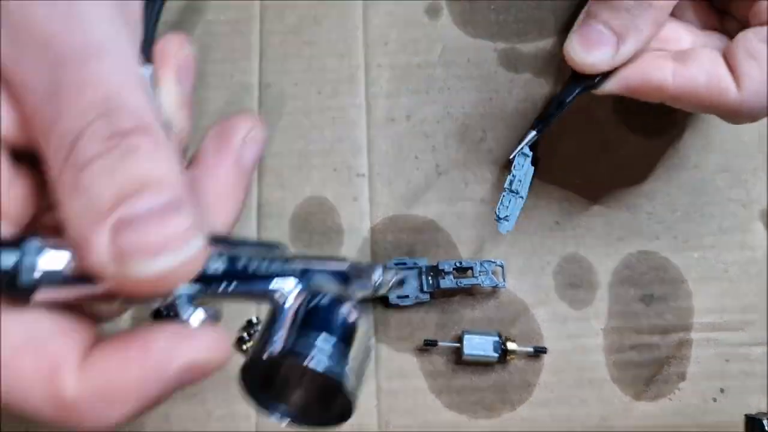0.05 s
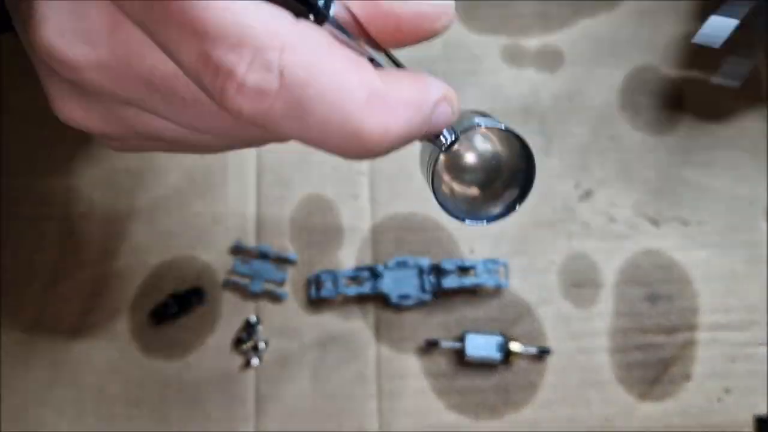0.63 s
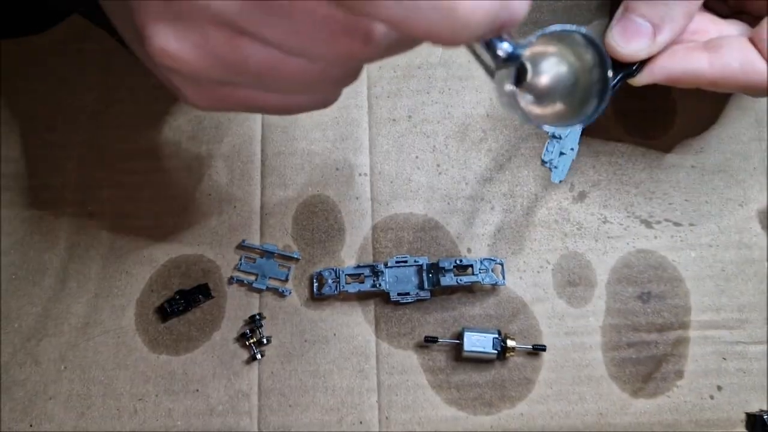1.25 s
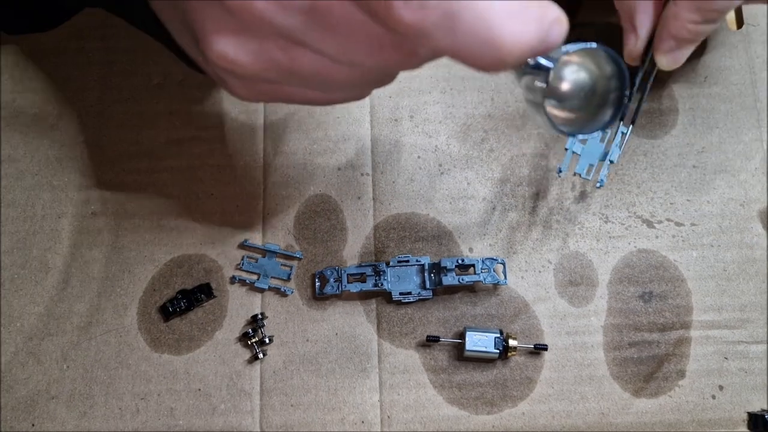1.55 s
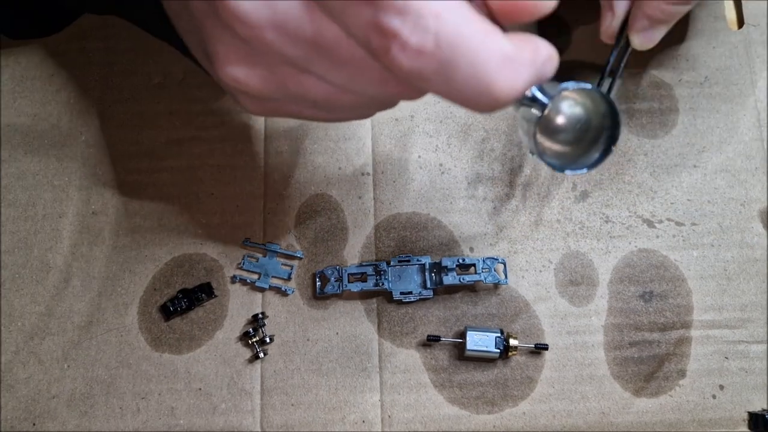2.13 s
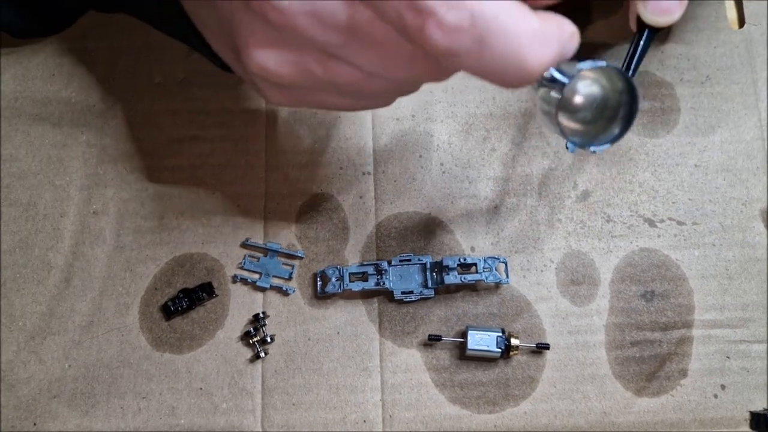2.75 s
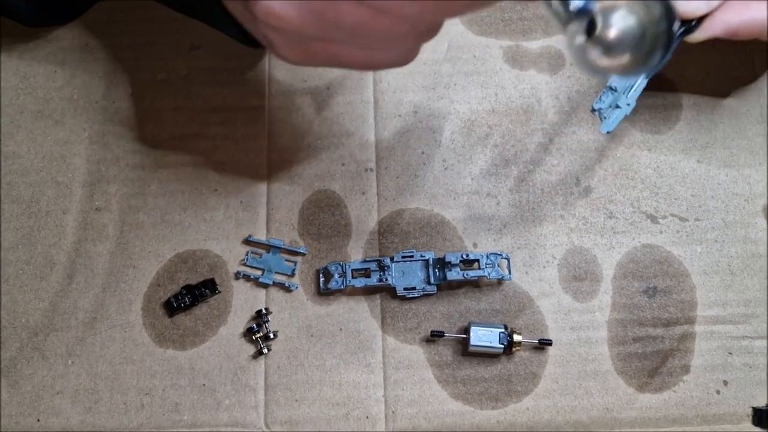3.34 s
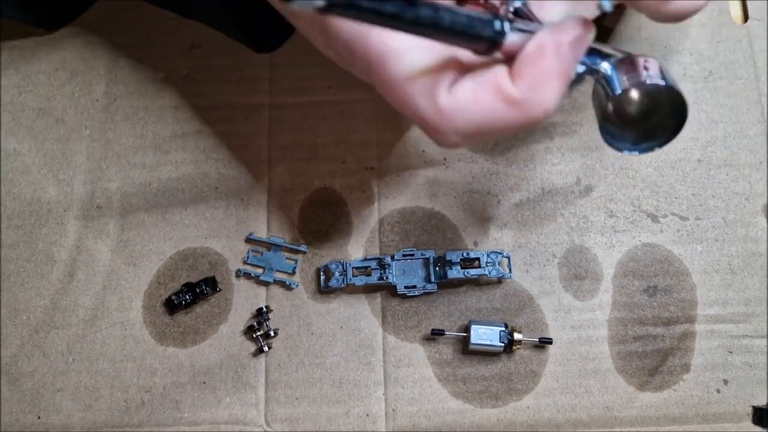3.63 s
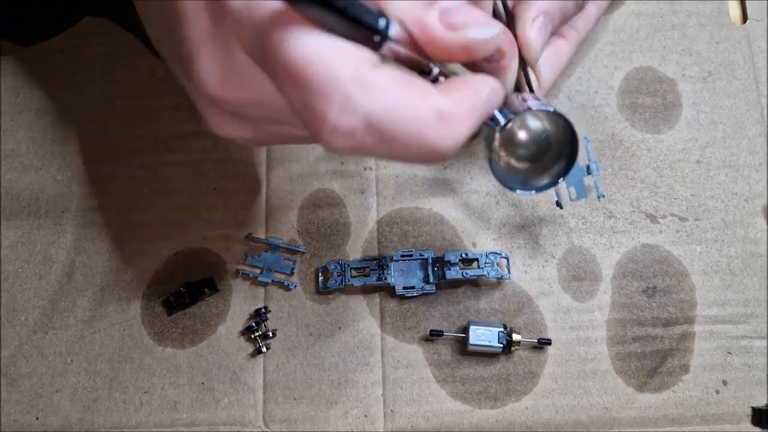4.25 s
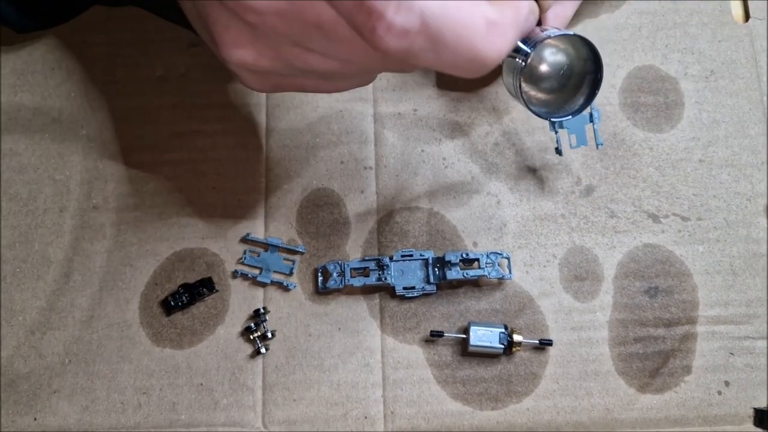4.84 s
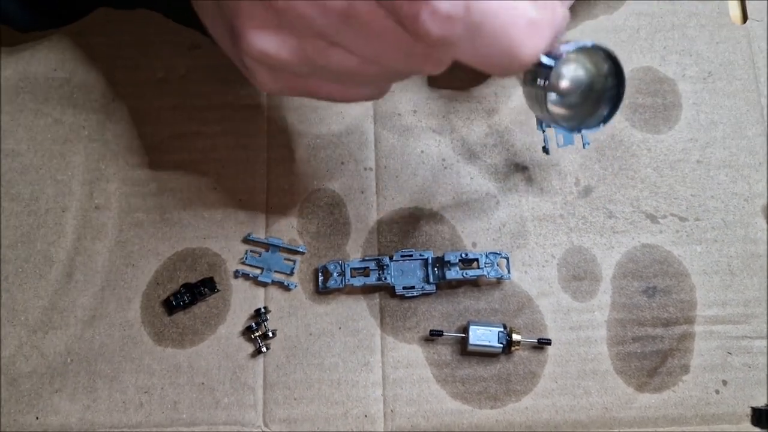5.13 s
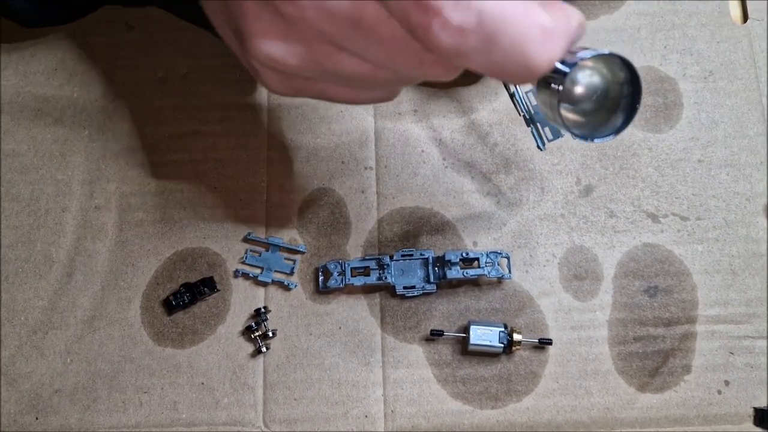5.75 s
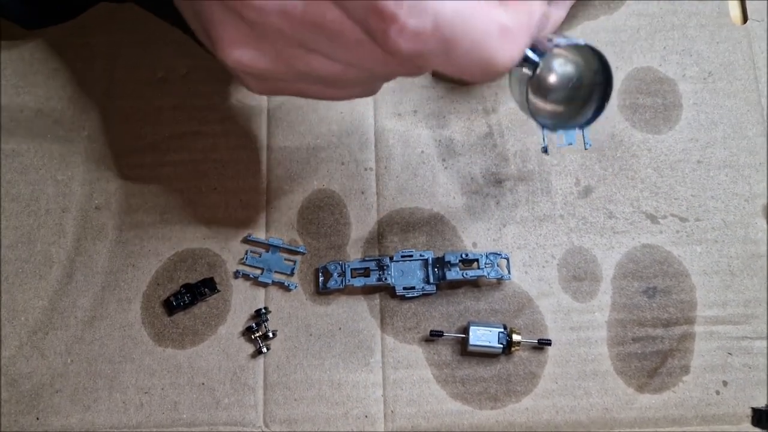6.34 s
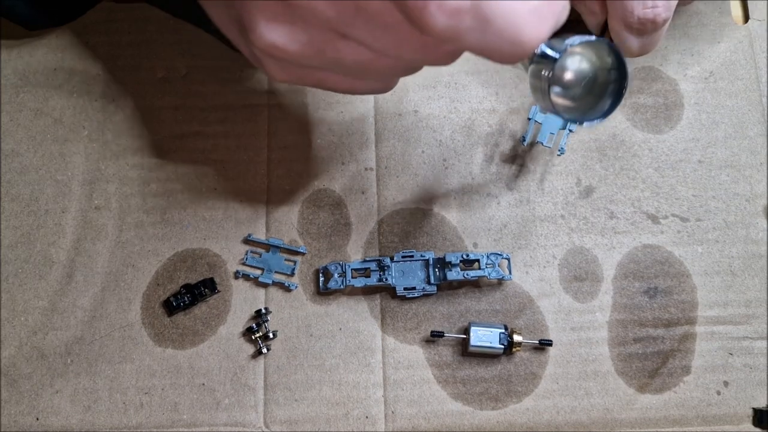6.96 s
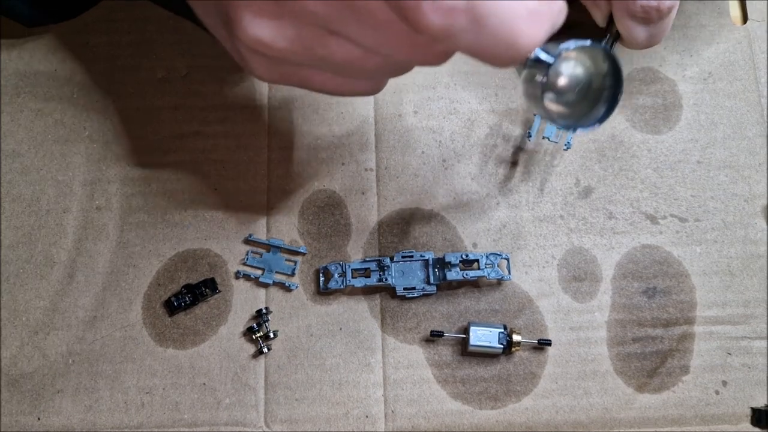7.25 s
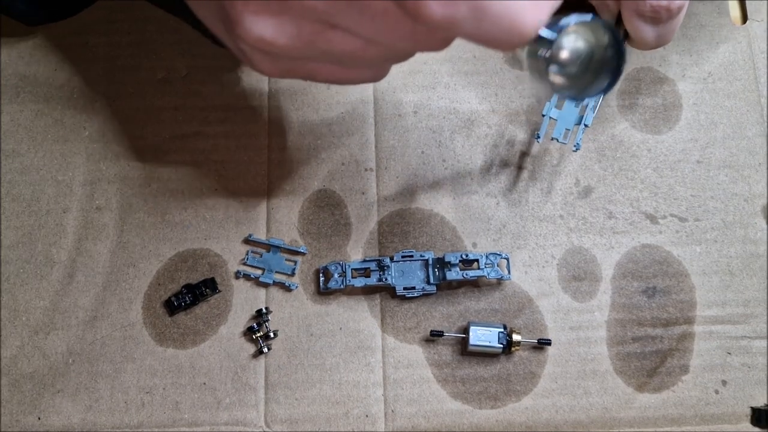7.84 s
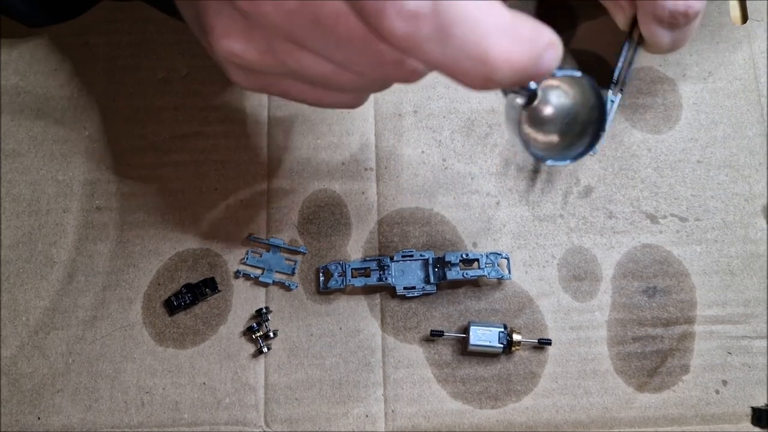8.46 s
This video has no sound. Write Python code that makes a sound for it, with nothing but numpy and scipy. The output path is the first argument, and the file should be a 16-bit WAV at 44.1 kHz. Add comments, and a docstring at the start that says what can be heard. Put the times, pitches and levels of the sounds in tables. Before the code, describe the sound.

A small compressor hums while an airbrush blows hissing bursts over small parts, with light tool clicks and a loud final jet of air.

```python
"""A small compressor hums at about 96 piston strokes a second, ducking at each puff of air and swelling in
long pauses. An airbrush blows dry air over small parts held in tweezers above cardboard: short taps of
the trigger, then longer blows. The tools click, and squeak once. Last comes a loud, ringing blast where
the jet strikes an edge of the part. Close, mono."""
import sys
import numpy as np
from scipy import signal
from scipy.fft import rfft, irfft, next_fast_len
from scipy.io import wavfile
from scipy.ndimage import uniform_filter1d, map_coordinates

SR = 44100
rng = np.random.default_rng(int(sys.argv[2]) if len(sys.argv) > 2 else 0)


def generate_wav(signal):
    """Clip the signal to [-1, 1] and save it as 16-bit WAV at the path in sys.argv[1]."""
    frames = np.transpose(np.atleast_2d(signal))
    scaled = np.clip(frames, -1, 1) * 32767
    pcm = np.round(scaled).astype(np.int16)
    wavfile.write(sys.argv[1], SR, pcm)


N = 374830
TOP_HZ = 15820


def amp(db):
    """Decibels to gain."""
    return 10 ** (np.asarray(db) / 20)


def unit(x):
    """Scale to rms 1."""
    return x / np.sqrt(np.mean(x ** 2) + 1e-20)


def clock():
    """Sample times in s."""
    return np.arange(N) / SR


def curves(rows):
    """One value per sample for each column after the time."""
    times_s, *columns = np.transpose(rows)
    return [np.interp(clock(), times_s, column) for column in columns]


def colour(points):
    """Gain against log frequency through (f/Hz, level/dB) points."""
    points_hz, db = np.transpose(points)
    return lambda hz: amp(np.interp(np.log(hz + 1), np.log(points_hz), db))


def resonances(modes):
    """Causal response of (f/Hz, width/Hz, level/dB) modes, alternating in sign."""
    return lambda hz: sum((-1) ** k * amp(db) * 1j * hz * width / (centre ** 2 - hz ** 2 + 1j * hz * width)
                          for k, (centre, width, db) in enumerate(modes))


def filtered(x, response):
    """Apply a frequency response."""
    size = next_fast_len(N + SR // 2)
    return irfft(rfft(x, size) * response(np.fft.rfftfreq(size, 1 / SR)), size)[:N]


def hiss(spectrum):
    """Coloured noise, rms 1, rolled off below its first point."""
    skirt = lambda hz: np.minimum(hz / spectrum[0][0], 1) ** 2
    return unit(filtered(rng.standard_normal(N), lambda hz: colour(spectrum)(hz) * skirt(hz)))


def wobble(rate_hz):
    """Smooth random curve with knots at rate_hz."""
    return map_coordinates(rng.standard_normal(int(N * rate_hz / SR) + 4), [clock() * rate_hz])


def gate(on_s, off_s, rise_s, fall_s):
    """1 between two times, with linear ramps."""
    t = clock()
    return np.clip((t - on_s) / rise_s + .5, 0, 1) * np.clip((off_s - t) / fall_s + .5, 0, 1)


def lagged(x, lag_s):
    """First-order lag."""
    step = 1 / (lag_s * SR)
    return signal.lfilter([step], [1, step - 1], x)


def stroke_rate_hz(valve, rest_hz=97.09, sag_hz=1.2, jolt_hz=.83, full_load=.67):
    """The motor sags while air is drawn and is jolted as the valve opens or shuts."""
    load = np.minimum(lagged(valve, lag_s=.09) / full_load, 1)
    return rest_hz - sag_hz * load + jolt_hz * (valve - lagged(valve, lag_s=.07))


# hum swells: start t/s, gain/dB
HUM_SWELLS = [(-.04, 10), (.72, 12), (3.68, 16), (6.66, 4)]


def swell_db(valve_threshold_db, rise_s=.31, drop_s=.0068, linger_s=.26, linger_share=.41):
    """The hum grows in a long pause and drops at the next full press; a share lingers."""
    t, total_db = clock(), np.zeros(N)
    for start_s, gain_db in HUM_SWELLS:
        press_s = min(on_s for on_s, _, db in TRIGGER_PRESSES if on_s > start_s and db > valve_threshold_db)
        grown = np.clip((np.minimum(t, press_s) - start_s) / rise_s, 0, 1)
        since_s = np.maximum(t - press_s, 0)
        lingering = linger_share * np.exp(-since_s / linger_s)
        dropping = (1 - linger_share) * np.exp(-(since_s / drop_s) ** 2)
        total_db += gain_db * grown * (lingering + dropping)
    return total_db


# piston tone: multiple of stroke rate, relative level/dB
STROKE_PARTIALS = [(1, -35), (2, -7), (3, -13), (4, -2), (5, -3), (6, 0), (7, -3), (8, -2.5), (9, -13),
                   (10, -1), (11, -0.5), (12, -7), (13, -15.5), (14, -19), (15, -3.5), (16, -68), (17, 0),
                   (18, -8.5), (19, 1), (20, -5), (21, -0.5), (22, -3), (23, -7), (24, -25), (25, -4.5),
                   (26, -2), (27, -5), (28, -18), (29, -3), (30, -43), (31, -22), (32, -6), (33, -6.5)]
# motor mains hum: f/Hz, relative level/dB
MAINS_PARTIALS = [(100, -35), (400, -18), (500, -20), (700, -30), (800, -21), (900, -24), (1300, -35)]
# air chuff of a stroke: f/Hz, relative level/dB
CHUFF_SPECTRUM = [(40, -38), (100, -42), (200, -12), (500, -8), (1300, -10.5), (2000, -1), (2800, 5),
                  (4000, -6), (5300, -6), (7800, -10), (9500, -10), (12500, -10), (16000, -15)]
# casing resonances: f/Hz, width/Hz, relative level/dB
CASING_MODES = [(1858, 44, -4), (2792, 39, 1.5), (4980, 130, -1), (5295, 100, -4), (6190, 160, -4.5),
                (6960, 260, -11), (7520, 200, -10.5), (10240, 42, -4), (12100, 250, -21), (12050, 250, -24)]


def compressor(valve, hum_db=-50, duck_db=-7, dip_db=-2, bass_db=-50.5, bass_duck_db=-2.5, pulse_db=-7):
    """Each piston stroke gives a tone, a chuff of air and a casing rattle; all duck while air flows."""
    turns = np.cumsum(stroke_rate_hz(valve) * (1 + .0006 * wobble(25))) / SR
    # late, scattered upper partials smear each pulse
    tone = unit(sum(amp(db) * np.cos(2 * np.pi * k * turns + 1.08 * rng.standard_normal() - k * k / 5)
                    for k, db in STROKE_PARTIALS))
    mains = sum(amp(db) * np.sqrt(2) * np.sin(2 * np.pi * (hz * clock() + rng.random()))
                for hz, db in MAINS_PARTIALS)
    # the buzz repeats every stroke; the air noise does not
    above_tone = np.arange(165) > len(STROKE_PARTIALS)
    cycle = unit(irfft(above_tone * np.exp(2j * np.pi * rng.random(len(above_tone))), 1024))
    buzz = map_coordinates(cycle, [turns % 1 * len(cycle)], mode="grid-wrap")
    drive = amp(pulse_db * (turns % 1)) * (.8 * buzz + rng.standard_normal(N))
    chuff = unit(filtered(drive, colour(CHUFF_SPECTRUM)))
    rattle = unit(sum(filtered(drive, resonances([mode])) * amp(1.56 * wobble(9.2))
                      for mode in CASING_MODES))
    running = amp(-1) * tone + mains + amp(-3.5 + wobble(13)) * chuff + amp(-1 + wobble(7.2)) * rattle
    bass = filtered(running, lambda hz: 1 / (1 + (hz / 520) ** 16))
    # deepest dip just after the valve opens; the bass swings less
    swing_db = swell_db(LEAK_DB) + dip_db * np.maximum(valve - lagged(valve, lag_s=.12), 0)
    upper_gain = amp(hum_db + swing_db + duck_db * valve)
    bass_gain = amp(bass_db + .79 * swing_db + bass_duck_db * valve)
    # partial 19 sits on a casing mode and whines on through the blows
    whine_db = -59.5 - 8 * np.maximum(valve - lagged(valve, lag_s=.34), 0) + 2 * wobble(4.5)
    whine = amp(whine_db) * np.sin(2 * np.pi * 19 * turns + .6 * wobble(45))
    return bass * bass_gain + (running - bass) * upper_gain + whine


# workshop noise: f/Hz, relative level/dB
ROOM_SPECTRUM = [(25, -20), (100, -11), (250, -4), (500, -3.5), (1300, -.5), (2700, 8.5), (4000, 4.5),
                 (5300, 6.5), (9000, -1), (16000, -8)]


def room_tone():
    """Faint steady workshop noise."""
    return amp(-54) * hiss(ROOM_SPECTRUM)


LEAK_DB = -39.5  # a fainter press only cracks the valve: no load on the compressor
# taps and held blows: open t/s, close t/s, hiss level/dB
TRIGGER_PRESSES = [(0.326, 0.365, -30.5), (.401, 0.435, -34), (0.463, 0.497, -33), (0.528, 0.56, -35),
                   (.865, 0.974, -40), (1.236, 1.267, -30.5), (1.298, 1.335, -37), (1.387, 1.43, -36.5),
                   (1.57, 1.605, -26.5), (1.634, 1.67, -31), (1.705, 1.742, -30), (1.767, 1.802, -26),
                   (1.821, 1.859, -21.5), (1.917, 2.585, -32.5), (2.679, 2.991, -36), (3.049, 3.204, -36),
                   (3.277, 3.464, -34), (4.694, 4.721, -22.5), (4.791, 4.808, -32.5), (4.844, 4.878, -31.5),
                   (4.939, 4.981, -30.5), (5.017, 5.073, -29.5), (5.093, 5.14, -31.5), (5.161, 5.212, -35),
                   (5.227, 5.267, -30), (5.281, 5.454, -31.5), (5.637, 5.677, -30), (5.7, 5.736, -34),
                   (5.803, 5.835, -36), (5.866, 5.909, -35.5), (5.938, 5.976, -34), (6.021, 6.478, -36),
                   (6.563, 6.611, -36), (6.624, 6.663, -33.5), (6.87, 8.458, -32.5)]
# jet grazing the part: centre t/s, half width/s, gain/dB
JET_GRAZES = [(1.944, 0.041, 5), (2.435, 0.044, 2), (2.557, .015, 0.5), (3.454, .012, 6.5),
              (6.25, 0.12, 3.5), (7.02, 0.084, 3.5)]


def trigger(spit_db=4, spit_s=.0055, wander_db=.57):
    """Valve opening and hiss gain: stored pressure spits out, then the flow wanders over the part."""
    t, valve, hiss_gain = clock(), np.zeros(N), np.zeros(N)
    for on_s, off_s, db in TRIGGER_PRESSES:
        opening = gate(on_s, off_s, rise_s=.0025, fall_s=.007)
        valve += opening * (db > LEAK_DB)
        hiss_gain += opening * amp(db + spit_db * np.exp(-np.abs(t - on_s) / spit_s))
    valve = uniform_filter1d(np.minimum(valve, 1), size=220)
    graze_db = sum(db * np.exp(-((t - centre_s) / half_s) ** 2) for centre_s, half_s, db in JET_GRAZES)
    return valve, hiss_gain * amp(graze_db + wander_db * wobble(35))


# nozzle hiss: f/Hz, relative level/dB
JET_SPECTRUM = [(1000, -25), (2500, -17.5), (4200, -14.5), (5300, -6.5), (6500, -12), (7700, -6),
                (8500, -8), (9700, -1.5), (11200, -0.5), (11800, -3.5), (13000, 4.5), (13700, 4),
                (14900, 5.5), (16000, 3)]
# squareness of aim, heard as sharpness: t/s, high band over low band/dB
AIM_TILT = [(.4, -3), (1.3, -6), (1.8, 1.5), (2.2, -1), (2.6, -2), (3.1, -8), (3.45, -6), (4.7, -1),
            (5.3, 0), (5.8, -2.5), (6.2, -4.5), (6.6, -8), (7, 2), (7.3, -4)]


def jet(hiss_gain, split_hz=12300, flutter_db=2, drift_db=1.4):
    """Nozzle hiss; its low and high bands waver apart as the jet wanders over the part."""
    air = reflections(hiss(JET_SPECTRUM))
    low = filtered(air, lambda hz: 1 / (1 + (hz / split_hz) ** 16))
    tilt_db = curves(AIM_TILT)[0]
    low_gain = amp(drift_db * wobble(18) - tilt_db / 2)
    high_gain = amp(drift_db * wobble(24) + tilt_db / 2)
    return (low * low_gain + (air - low) * high_gain) * hiss_gain * amp(.44 + flutter_db * wobble(90))


def reflections(x, count=12):
    """Weak echoes off hands, cup and cardboard; their movement shifts the notches in the hiss."""
    out = x.copy()
    for delay_s in rng.uniform(.002, .012, count):
        moving_s = delay_s + 12e-6 * wobble(5)
        out += .12 * rng.choice([-1, 1]) * map_coordinates(x, [np.arange(N) - moving_s * SR])
    return out * np.std(x) / np.std(out)


def room(x, t60_s):
    """Short diffuse tail from bench and walls."""
    t = np.arange(SR // 3) / SR
    tail = rng.standard_normal(len(t)) * amp(-60 * t / t60_s) * (t > .002)
    return signal.fftconvolve(x, tail / np.linalg.norm(tail))[:N]


# metal and plastic contacts: t/s, peak level/dB, f/Hz, t60/s
TOOL_CONTACTS = [(.537, -26, 9000, 0.027), (0.5412, -5.5, 6650, 0.0082), (.541, -31.5, 1730, .014),
                 (.5742, -19, 10000, 0.0068), (.586, -26, 7400, 0.011), (.5982, -16.5, 11000, .004),
                 (.603, -19, 9480, .009), (.612, -25, 7000, .012), (0.861, -17, 10200, .0077),
                 (.941, -25, 2820, .066), (1.481, -30.5, 6494, 0.052), (1.813, -29, 6500, 0.031),
                 (3.446, -25, 6500, 0.06), (3.554, -34, 7000, .04), (4.742, -28, 6200, .05),
                 (5.782, -30, 5997, .036), (5.802, -25, 10030, .008), (6.008, -31, 6100, 0.054),
                 (6.529, -34, 6150, .04)]


def clicks():
    """Each contact is a fast-dying crack of noise around its own pitch."""
    out, t = np.zeros(N), np.arange(SR // 10) / SR
    for start_s, db, pitch_hz, t60_s in TOOL_CONTACTS:
        band_hz = [pitch_hz / 1.45, min(pitch_hz * 1.45, TOP_HZ)]
        bandpass = signal.butter(2, band_hz, "bandpass", fs=SR, output="sos")
        crack = signal.sosfilt(bandpass, rng.standard_normal(len(t)) * amp(-60 * t / t60_s))
        out[round(start_s * SR):][:len(t)] += amp(db) * crack / np.abs(crack).max()
    return out


# squeak contour: t/s, f/Hz, level/dB
SQUEAK_TRACK = [(0.806, 924, -55), (.809, 889, -23), (.815, 843, -20), (0.819, 943, -14.5),
                (.825, 1024, -13.5), (0.829, 1064, -10.5), (0.832, 1050, -40), (.834, 1040, -80)]
# colour of its harmonics: f/Hz, gain/dB
SQUEAK_SPECTRUM = [(850, -15.5), (1100, -15), (1750, -3), (2050, -9.5), (2600, -9), (3200, -12), (3700, -4),
                   (4150, 0), (4600, -16), (5300, -22), (7500, -50), (11000, -23.5), (14000, -50)]


def squeak():
    """Brief stick-slip tone that rises as the grip shifts."""
    pitch_hz, db = curves(SQUEAK_TRACK)
    phase = 2 * np.pi * np.cumsum(pitch_hz) / SR
    tone = sum(colour(SQUEAK_SPECTRUM)(k * pitch_hz) * np.sin(k * phase) for k in range(1, 13))
    return tone * amp(db) * gate(SQUEAK_TRACK[0][0], SQUEAK_TRACK[-1][0], rise_s=.00079, fall_s=.001)


# jet catching the edge: on t/s, off t/s, rush level/dB, ring level/dB
EDGE_STRIKES = [(7.316, 7.355, -18, -13.5), (7.426, 7.58, -15.5, -13.5), (7.638, 7.736, -14, -18.5),
                (7.74, 7.912, -15, -15), (7.964, 8.064, -13.5, -18.5), (8.1, 8.187, -14.5, -15.5),
                (8.207, 8.443, -17.5, -17)]
# air resonances around part and tweezers: f/Hz, width/Hz, relative level/dB
GAP_MODES = [(3400, 340, -18), (4710, 240, -12), (5450, 190, -7.5), (7800, 270, -7), (8760, 240, -6),
             (9100, 150, 3), (9570, 180, 4), (10270, 190, 7.5), (11410, 240, 6)]
# edge rush, fine sizzle and air splash: f/Hz, relative level/dB
RUSH_SPECTRUM = [(1500, -48), (2000, -28), (2550, -12.5), (3030, -24.5), (3300, -9), (4300, -9),
                 (5300, -6.5), (6400, -9.5), (7200, -9), (7700, -6), (8200, -5.5), (9300, 0.5),
                 (11200, 1.5), (13000, -18)]
SIZZLE_SPECTRUM = [(6000, -21), (8000, -3.5), (10500, -6), (11800, -1), (13100, 3), (13500, -4),
                   (14000, 4.5), (14650, -8), (15100, 0), (16000, -11)]
SPLASH_SPECTRUM = [(25, -35), (100, -19), (200, -24.5), (350, -25.5), (700, -17.5), (1000, -21.5),
                   (1300, -12), (1900, -18), (3500, -10), (7000, -7.5), (10000, -15), (11500, 3),
                   (13000, -3), (16000, -14)]
# sizzle envelope: t/s, relative level/dB
SIZZLE_TRACK = [(7.34, -16), (7.366, -22), (7.498, -19.5), (7.634, -23.5), (7.672, -16), (7.954, -21.5),
                (7.974, -15.5), (8.04, -19.5), (8.44, -13)]


def blast(start_s=7.3325, end_s=8.448, t60_s=.086, beside_rush_db=-26.5, beside_ring_db=-29,
          flutter_db=1.3):
    """The jet slides on and off an edge: loud ringing turbulence and sizzle over a steady air splash."""
    rush_gain, ring_gain = amp(beside_rush_db), amp(beside_ring_db)
    for on_s, off_s, rush_db, ring_db in EDGE_STRIKES:
        caught = gate(on_s, off_s, rise_s=.02, fall_s=.025)
        rush_gain = rush_gain + caught * (amp(rush_db) - amp(beside_rush_db))
        ring_gain = ring_gain + caught * (amp(ring_db) - amp(beside_ring_db))
    turbulence = hiss([(3000, .011), (16000, .005)])
    # each gap rings more or less as the part turns in the jet
    ringing = unit(sum(filtered(turbulence, resonances([gap])) * amp(3.5 * wobble(11))
                       for gap in GAP_MODES))
    edge = (rush_gain * hiss(RUSH_SPECTRUM) + ring_gain * ringing) * amp(flutter_db * wobble(110))
    sizzle = amp(curves(SIZZLE_TRACK)[0] + 1.3 + flutter_db * wobble(110)) * hiss(SIZZLE_SPECTRUM)
    splash = amp(-23) * hiss(SPLASH_SPECTRUM)
    release = amp(-60 * np.maximum(clock() - end_s, 0) / t60_s)
    return (reflections(edge + sizzle) + splash) * (clock() > start_s) * release


def scene():
    """Air, handling, compressor and room tone, alike in both channels."""
    valve, hiss_gain = trigger()
    air = jet(hiss_gain) + blast()
    handling = clicks() + squeak()
    reverb = amp(-15) * room(air, t60_s=.026) + amp(-11) * room(handling, t60_s=.048)
    mono = air + handling + reverb + compressor(valve) + room_tone()
    return np.array([mono, mono])


def record(dry):
    """Hard limit at full scale, then cut everything above TOP_HZ."""
    limited = np.clip(dry, -1, 1)
    return np.array([filtered(channel, lambda hz: hz < TOP_HZ) for channel in limited])


dry = scene()
out = record(dry)
generate_wav(out)
```